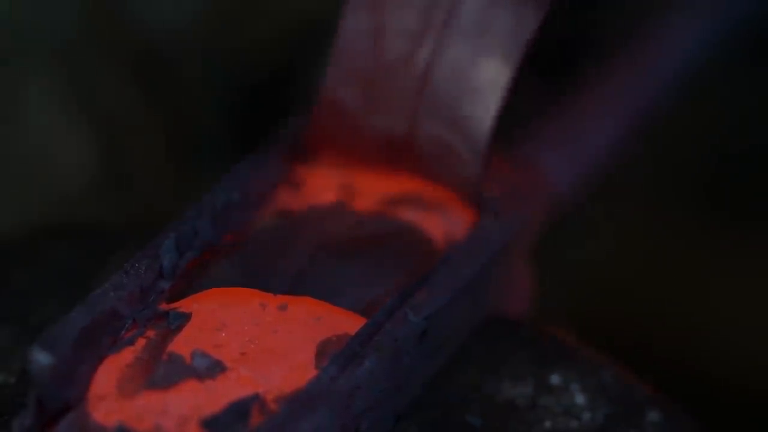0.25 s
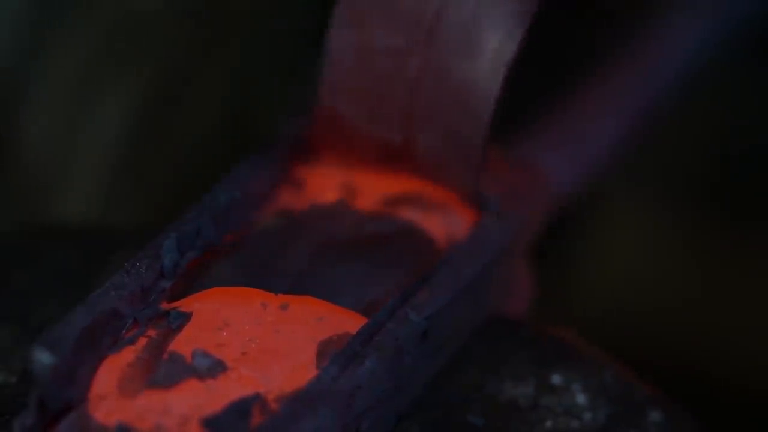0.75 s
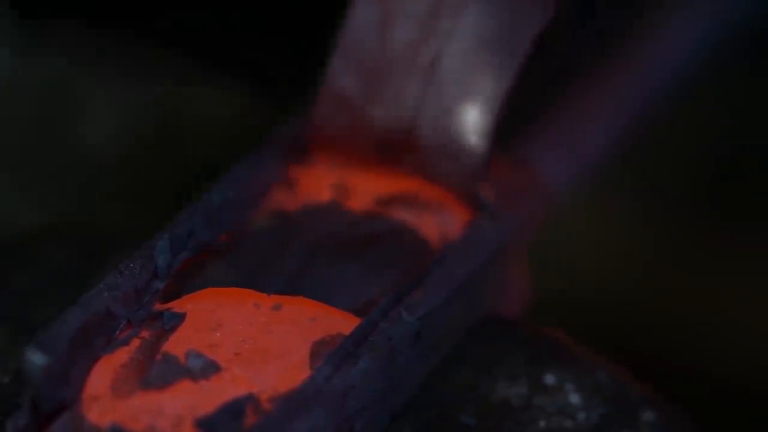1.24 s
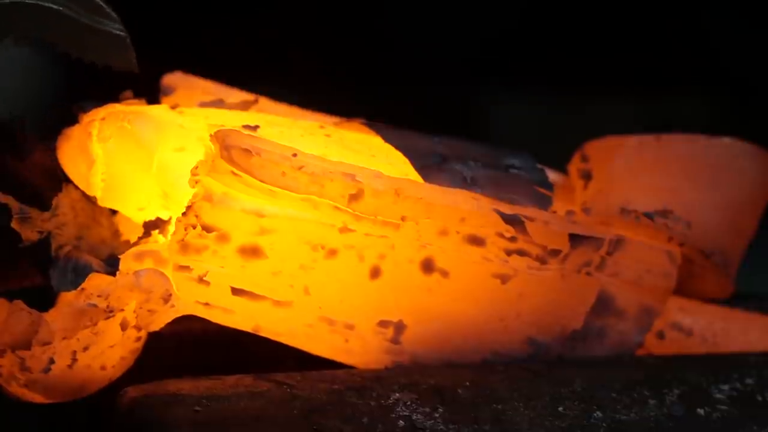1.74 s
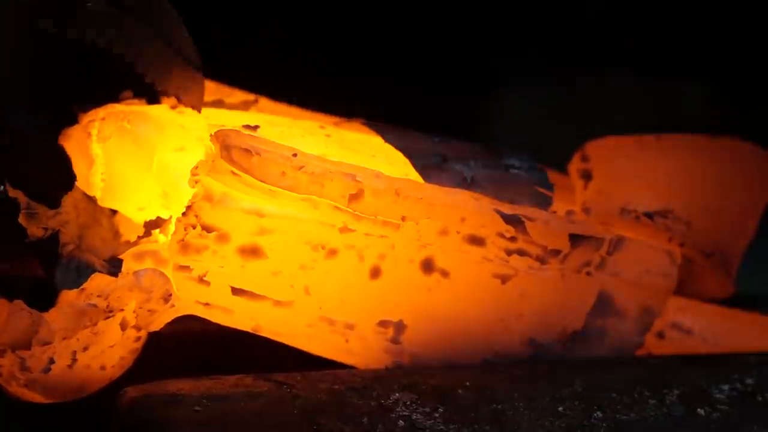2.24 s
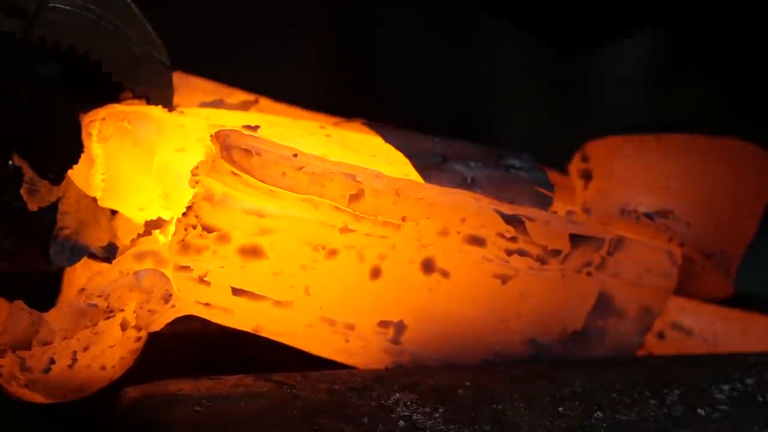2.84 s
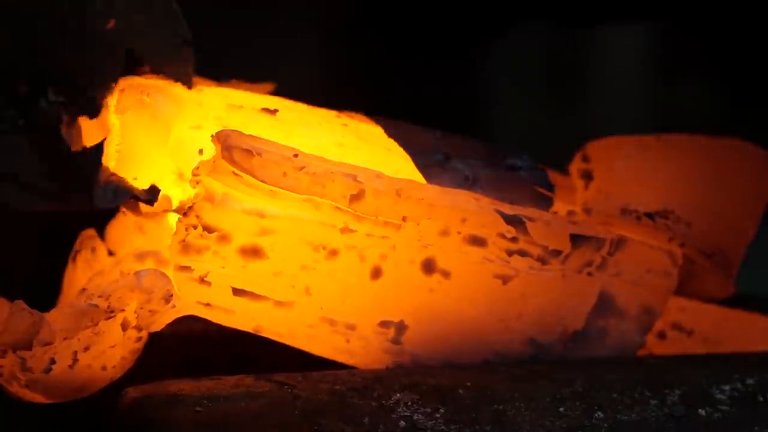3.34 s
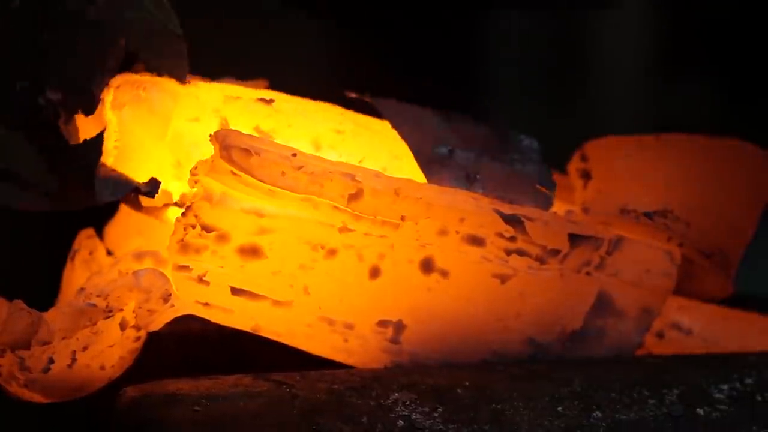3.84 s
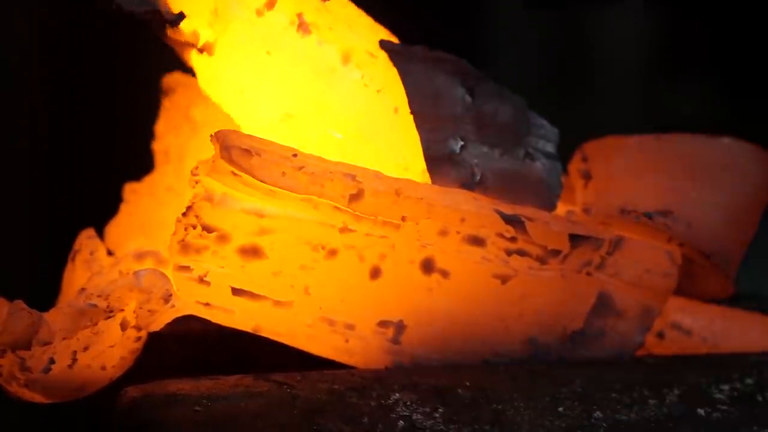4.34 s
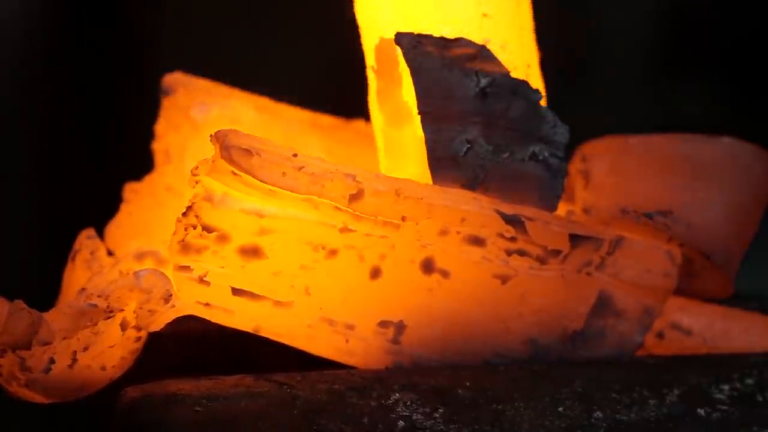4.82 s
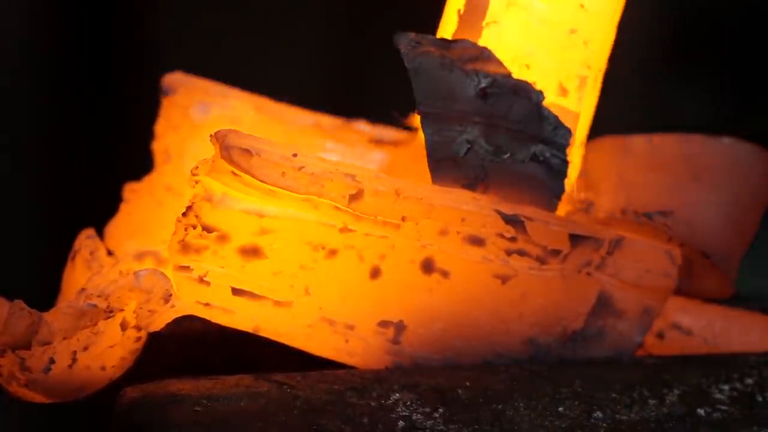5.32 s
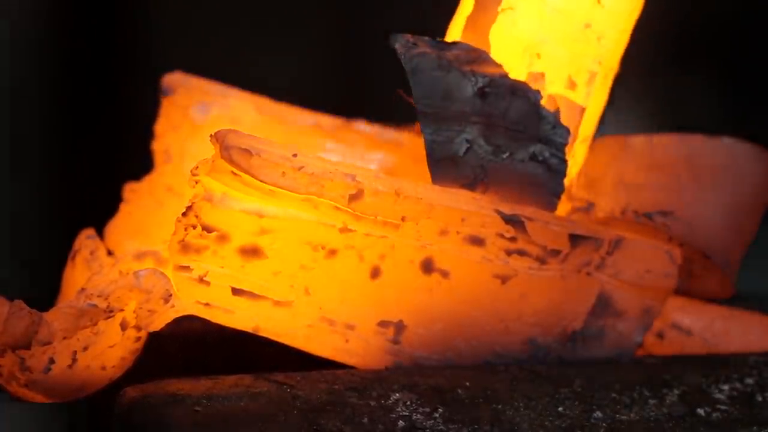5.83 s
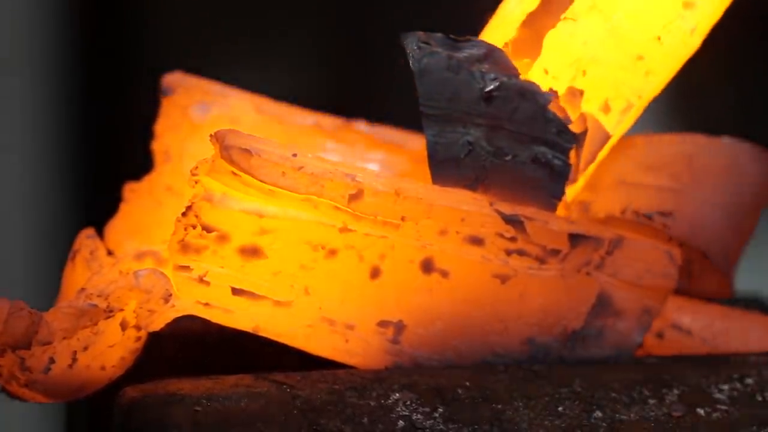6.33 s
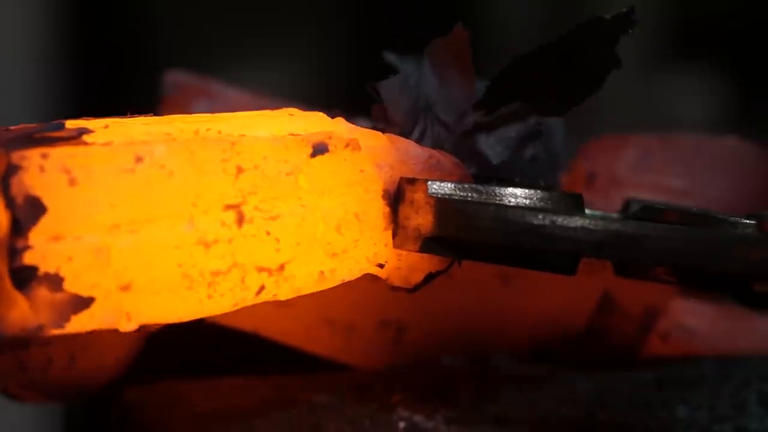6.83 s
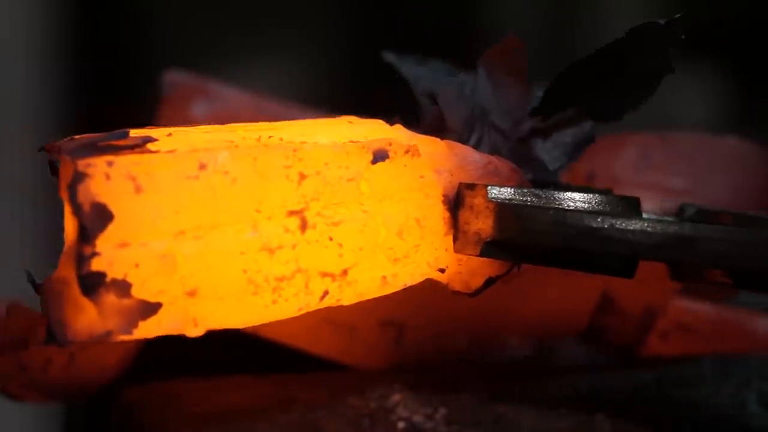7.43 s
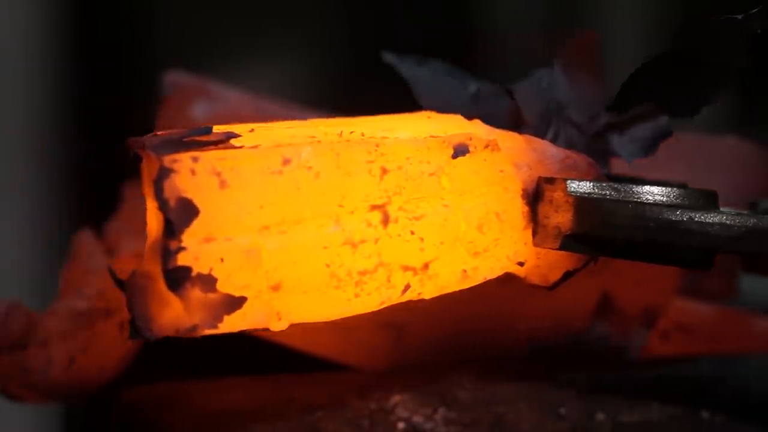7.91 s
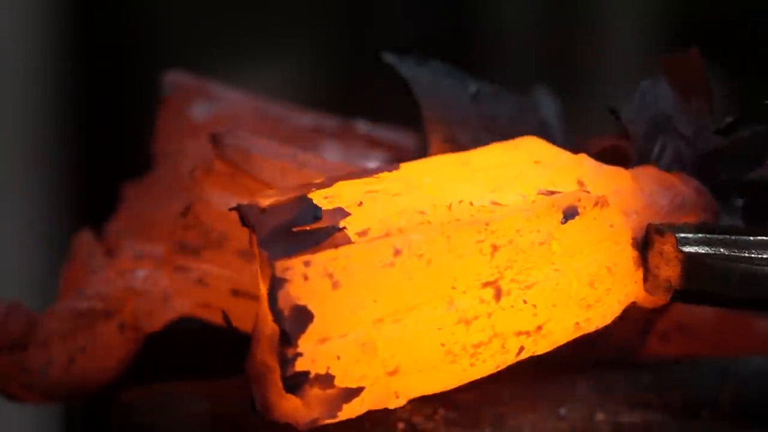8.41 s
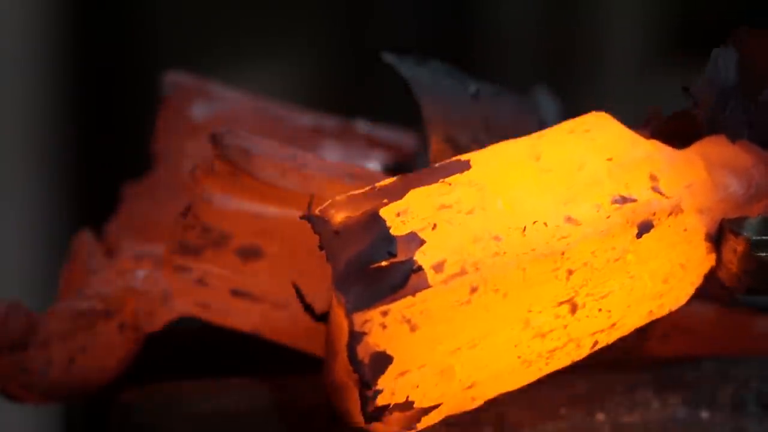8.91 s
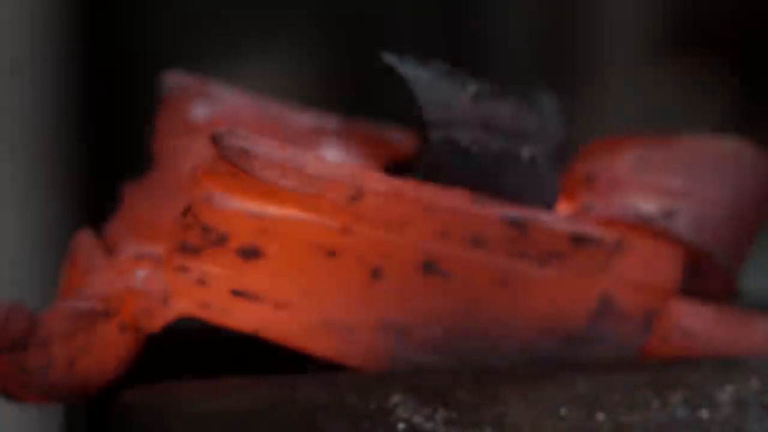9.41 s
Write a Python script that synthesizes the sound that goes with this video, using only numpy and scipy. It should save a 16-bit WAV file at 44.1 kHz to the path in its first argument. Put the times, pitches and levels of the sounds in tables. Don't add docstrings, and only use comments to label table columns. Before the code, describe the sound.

A gas forge booms low in a workshop, with faint jet hiss and mains hum and a lone early tick. The sound abruptly becomes fuller as tongs clink on hot steel, scale snapping and crumbling brightly. A short scraping slide follows, then a sharp cut to a steady roar with one last small knock. Close microphone, slight room echo.

```python
import sys
import numpy as np
from scipy import signal
from scipy.fft import rfft, irfft, next_fast_len
from scipy.io import wavfile
from scipy.ndimage import uniform_filter1d, minimum_filter1d, map_coordinates

SR = 44100
rng = np.random.default_rng(int(sys.argv[2]) if len(sys.argv) > 2 else 0)


def dump_mix(stems):
    frames = np.atleast_2d(stems).T
    limited = np.clip(frames, -1, 1)
    pcm = np.round(limited * 32767).astype(np.int16)
    wavfile.write(sys.argv[1], SR, pcm)


def linear_from_db(decibels):
    return 10 ** (np.asarray(decibels, float) / 20)


N = 426091
TOP_HZ = 15820

CUTS = [1.5241, 6.5789]
# start_s, fall_s (over 20 dB; negative leaves only a trickle),
# dull_swarm_db, middle_swarm_db, bright_swarm_db
KNOCKS = [(0.662, 0.03, -48.5, -63.5, -62.5), (2.292, 0.4, -76.5, -66.5, -75),
          (1.525, 0.03, -49, -43.5, -49.5), (1.546, 0.14, -50, -57, -55), (1.6, -0.02, -46.5, -48, -43),
          (2.253, 0, -71.5, -68, -68), (2.55, 0.05, -59.5, -67.5, -73.5), (2.563, -0.1, -69, -62, -63),
          (2.59, 0, -74, -66, -61.5), (3.372, 0.02, -51, -56, -53.5), (3.38, 0.03, -51, -46.5, -42.5),
          (3.799, -0.1, -74, -66, -55.5), (3.815, -0.07, -72, -66, -54), (3.82, -0.15, -63, -63.5, -54),
          (3.833, 0, -47.5, -46, -44), (4.071, 0.15, -73, -56.5, -68.5), (4.233, 0.02, -49.5, -43, -39),
          (4.358, .045, -64, -50.5, -53), (4.789, -0.2, -70, -62, -62), (4.842, -0.2, -72, -66, -62.5),
          (4.876, .07, -76, -50, -59.5), (9.484, 0, -55, -51.5, -53)]
# centre_hz, width_hz, level_db
BAR = [(5300, 330, 2), (6340, 450, 7), (6950, 180, 4), (8340, 250, 5.5), (10200, 970, 10), (11000, 300, 3),
       (13500, 900, 4), (15200, 800, 6.5)]


def unit(x):
    return x / np.sqrt(np.mean(x ** 2) + 1e-20)


def along(points, hz):
    f, v = np.transpose(points)
    return np.interp(np.log(hz + 1), np.log(f + 1), v)


def curves(spans):
    s, *cols = np.transpose([row for span in spans for row in span])
    return [np.interp(np.arange(N) / SR, s, c) for c in cols]


def filtered(x, response):
    m = next_fast_len(len(x) + 8192)
    return irfft(rfft(x, m) * response(np.fft.rfftfreq(m, 1 / SR)), m)[:len(x)]


def band(hz, centre_hz, octaves):
    return np.exp(-.5 * (np.log2((hz + 1) / centre_hz) / octaves) ** 2)


def lift(hz, modes):
    return sum(db / (1 + (2 * (hz - c) / w) ** 2) for c, w, db in modes)


def wobble(rate):
    return map_coordinates(rng.standard_normal(int(N * rate / SR) + 4), [np.arange(N) * rate / SR])


def stroke(s, rise_s, fall_s):
    out = np.zeros(N)
    start, stop = (int(np.clip(edge * SR, 0, N)) for edge in (s - 3 * rise_s, s + 4 * fall_s))
    t = np.arange(start, stop) / SR - s
    out[start:stop] = np.exp(np.log(10) * np.where(t < 0, t / rise_s, -t / fall_s))
    return out


def evened(x, share):
    power = np.abs(uniform_filter1d(uniform_filter1d(x ** 2, size=2500), size=2500)) + 1e-9
    return unit(x / power ** (share / 2))


def joined(takes):
    place = np.searchsorted(CUTS, np.arange(N) / SR)
    return sum(uniform_filter1d(1. * (place == k), size=60) * take for k, take in enumerate(takes))


def patchy(patchy_db):
    z = signal.stft(rng.standard_normal(N + 512), nperseg=512)[2]
    field = uniform_filter1d(rng.standard_normal(z.shape), size=6, axis=0)
    field = uniform_filter1d(field, size=14, axis=1)
    return signal.istft(z * linear_from_db(patchy_db * unit(field)), nperseg=512)[1][:N]


def rush(spectra, patchy_db, modes=()):
    air = patchy(patchy_db)
    takes = []
    for k, spectrum in enumerate(spectra):
        stretch = np.roll(air, k * SR)
        colour = lambda hz: linear_from_db(along(spectrum, hz) + lift(hz, modes)) * (hz < TOP_HZ)
        takes.append(unit(filtered(stretch, colour)))
    return joined(takes)


def blower():
    # pitch_hz, level_db (rms), sway_db
    mains = [(59.6, -48.5, -0.5), (117.4, -44, 2.5)]
    # frequency_hz, density_db (per Hz)
    drone_colour = [(15, -69.5), (30, -27.5), (45, -18.5), (59, -1), (70, -3), (88, 3.5), (100, -4.5),
                    (118, 6), (135, -6), (160, -13), (260, -120)]
    drone_db = [-51.5, -51, -50]
    t = np.arange(N) / SR
    hum = np.zeros(N)
    for hz, db, sway_db in mains:
        sway = map_coordinates(rng.standard_normal(90), [t * 8])
        hum += np.sqrt(2) * linear_from_db(db + sway_db * sway) * np.sin(2 * np.pi * hz * t)
    drone = unit(filtered(rng.standard_normal(N), lambda hz: linear_from_db(along(drone_colour, hz))))
    return joined([hum]) + joined(linear_from_db(drone_db)) * drone


def sizzle():
    sizzle_db = [-76, -79.5, -79.7]
    stirred_db, stirred_s = -37, .5
    clumps = linear_from_db(3 * map_coordinates(rng.standard_normal(300), [np.arange(N) * 25 / SR]))
    fizz = filtered(clumps * rng.standard_normal(N), lambda hz: band(hz, 13500, .22) * (hz < TOP_HZ))
    stirred = sum(linear_from_db(row[-1] + stirred_db) * stroke(row[0], 1 / SR, stirred_s) for row in KNOCKS)
    return linear_from_db(-5.5) * (linear_from_db(joined(sizzle_db)) + stirred) * unit(fizz)


def crumbling():
    # peak_s, fall_s (over 20 dB; zero or negative stays silent), dull_swarm_db,
    # middle_swarm_db, bright_swarm_db
    drags = [(.14, 0.2, -83, -76, -64), (3.865, 0.1, -64, -63, -60), (3.44, .06, -76, -72, -62),
             (3.55, 0.2, -80, -69, -78), (3.63, 0, -78, -78, -70), (3.93, 0.2, -70.5, -76, -76),
             (4.16, 0, -78, -76, -68), (4.3, 0.14, -76, -61, -61), (4.87, .06, -80, -66, -62),
             (4.905, 0.09, -75.5, -57, -57), (5.07, .12, -82, -72, -67), (5.33, 0.2, -84, -71, -72),
             (5.47, -0.2, -85, -67, -70), (5.9, 0.8, -84.5, -82, -74.5)]
    drag_rise = 0.73
    trickle_db, trickle_s = -24, 0.12
    shapes = []
    for s, fall_s, *_ in KNOCKS:
        trickle = linear_from_db(trickle_db) * stroke(s, 1 / SR, trickle_s)
        shapes.append(stroke(s, 1 / SR, fall_s) + trickle)
    for s, fall_s, *_ in drags:
        shapes.append(stroke(s, drag_rise * fall_s, fall_s))
    return linear_from_db(np.array(KNOCKS + drags)[:, 2:]).T @ np.array(shapes)


def scale():
    # lowest_hz, highest_hz
    swarms = [
        (5000, 9000),
        (9600, 12000),
        (12000, 18000),
    ]
    cracks = (rng.random(N) < 500 / SR) * rng.exponential(size=N)
    grit = rng.standard_normal(N) * (1 + 0.3 * unit(np.abs(uniform_filter1d(cracks, size=40))))
    out = np.zeros(N)
    for gain, (lo, hi) in zip(crumbling(), swarms):
        edge = lambda hz: (hz < TOP_HZ) / (1 + (lo / (hz + 1)) ** 32) / (1 + (hz / hi) ** 24)
        out += linear_from_db(-3.5) * gain * unit(filtered(grit, lambda hz: edge(hz) * linear_from_db(lift(hz, BAR))))
    return out


def slide():
    # peak_s, rise_s, fall_s (both over 20 dB), level_db
    swish_events = [
        (6.368, 0.099, 0.04, -43),
        (6.385, 0.1, 0.06, -42.5),
    ]
    # frequency_hz, density_db (per Hz)
    swish_colours = [
        [(1350, -30), (2300, -2), (2900, -1), (3400, -3), (4400, -1), (5200, -14.5), (6000, -40)],
        [(4600, -40), (5300, -20), (6350, -1.5), (7300, -3), (8420, -15), (11000, -13), (13800, -9.5),
         (15800, -11)],
    ]
    air = patchy(patchy_db=.8)
    out = np.zeros(N)
    for (*shape, db), colour in zip(swish_events, swish_colours):
        swish = unit(filtered(air, lambda hz: linear_from_db(along(colour, hz)) * (hz < TOP_HZ)))
        out += linear_from_db(db - 9.0) * np.minimum(.55, stroke(*shape)) * swish
    return out


def squeaks():
    # peak_s, rise_s, fall_s (both over 20 dB), level_db, pitch_hz
    rubs = [
        (0.76, .06, 0.3, -68, 5960),
        (1.008, .14, 0, -65.5, 6240),
        (5.045, .05, 0.2, -68, 10700),
        (5.135, 0.033, .1, -66, 11000),
        (5.36, 0.23, 0.3, -70.5, 10400),
        (5.55, .6, 0, -69, 10400),
        (5.75, .1, 0.4, -70.5, 10350),
        (6.15, .4, 0.4, -74, 10200),
        (6.165, .01, 0.2, -66, 10000),
    ]
    gains = np.array([linear_from_db(db) * stroke(s, rise_s, fall_s) for s, rise_s, fall_s, db, _ in rubs])
    pitch_hz = np.transpose(rubs)[-1][gains.argmax(axis=0)]
    start = rng.integers(0, N - 400, size=5000)
    size = linear_from_db(3 * rng.exponential(size=(len(start), 1)))
    hz = pitch_hz[start] * 2 ** (.022 * rng.standard_normal(len(start)))
    turns = np.arange(400) / SR * hz[:, None]
    wave = size * np.sin(2 * np.pi * turns) * np.exp(-turns / 26) * (1 - np.exp(-turns / 3))
    slips = np.bincount((start[:, None] + np.arange(400)).ravel(), wave.ravel(), N)
    return linear_from_db(0.8) * gains.max(axis=0) * evened(slips, share=.7)


def pings():
    # start_s, peak_db, pitch_hz, t60_s, rise_s
    modes = [(0.66, -49.5, 5450, 0.11, 0.00091), (0.6, -44, 3050, 0.023, .001),
             (1.53, -57, 5250, 0.22, .004), (2.55, -54.5, 4900, 0.075, 0.00089),
             (4.233, -49, 2020, 0.053, .001), (4.233, -58, 3880, .12, .001),
             (3.832, -37.5, 15600, .03, .001), (4.233, -41.5, 15500, .06, .001),
             (4.358, -53.5, 2000, .05, .001), (6.317, -56, 7900, .03, .001), (6.163, -54, 3400, .02, .001),
             (4.765, -57, 2530, .15, .006), (4.803, -58, 2545, .1, .004), (4.828, -52, 2520, 0.16, .005),
             (4.864, -55, 2100, .12, .004)]
    out, t = np.zeros(N + SR), np.arange(SR // 4) / SR
    for s, db, hz, t60, rise in modes:
        tone = (1 - np.exp(-t / rise)) * np.sin(2 * np.pi * hz * t)
        out[round(s * SR):][:len(t)] += linear_from_db(db - 60 * t / t60) * tone
    return out[:N]


def tongs():
    # start_s, mode_1_db, mode_2_db, mode_3_db, mode_4_db (peaks)
    blows = [(1.531, -50, -52, -62, -56), (1.546, -52, -49, -64, -62), (1.587, -52, -52, -66, -66),
             (1.6, -37.5, -43.5, -46, -37), (3.8333, -43, -28.5, -50, -44), (3.8385, -60, -54, -41, -52),
             (3.879, -66, -47, -62, -62), (4.2329, -51, -28, -29.5, -30), (4.358, -62, -60, -42, -43),
             (4.437, -69.5, -70.5, -61, -61), (9.4848, -64.5, -44.5, -41, -57)]
    jaws_hz = [7045, 8016, 11350, 13640]
    jaws_t60 = [.045, .032, .08, .085]
    out, t = np.zeros(N + SR), np.arange(SR // 4) / SR
    for s, *strengths_db in blows:
        for hz, t60, level_db in zip(jaws_hz, jaws_t60, strengths_db):
            beat = 1 + 0.45 * np.cos(2 * np.pi * rng.uniform(40, 110) * t)
            beat = beat + 0.91 * linear_from_db(-60 * t / 0.017)
            tone = (1 - np.exp(-t / 0.00045)) * np.sin(2 * np.pi * hz * t)
            out[round(s * SR):][:len(t)] += linear_from_db(level_db - 3.5 - 60 * t / t60) * beat * tone
    return out[:N]


def snaps():
    # start_s, peak_db, centre_hz, dull_part_db
    ticks = [(0.6609, -32, 6650, 2.5), (1.5247, -42, 10200, -12.5), (1.5287, -37, 9170, -19),
             (1.546, -30.5, 6800, -20.5), (1.5612, -25, 10170, -25), (1.5866, -35, 6780, -21),
             (1.5992, -25, 13630, -25), (2.2912, -44.5, 11200, -8), (2.5499, -42, 6680, -5),
             (3.3662, -46.5, 6000, -6), (3.3664, -47.5, 11000, -8), (3.372, -42, 4500, 6),
             (3.3798, -33.5, 6300, -14), (3.38, -27.5, 11200, -28), (3.3845, -32, 13000, -33),
             (3.5752, -47.5, 12200, -13), (3.7987, -41, 14040, -20), (3.8146, -33, 14050, -33),
             (3.8325, -26.5, 7900, -15), (4.0721, -42, 10350, -24), (4.1784, -48.5, 13930, -13),
             (4.232, -23, 11100, -25), (4.2733, -40, 9000, -25), (4.2958, -36.5, 13420, -24),
             (4.3052, -34, 11140, -34.5), (4.3412, -41, 10400, -20), (4.3576, -36.5, 10400, -9),
             (4.3836, -46, 14100, -26), (4.437, -44, 13500, -17.5), (4.8787, -42, 10100, -29),
             (6.1619, -42, 10200, -12), (6.5735, -23, 10200, -20.5), (9.4843, -41, 11350, -13)]
    # start_s, peak_db, centre_hz
    more_ticks = [(1.5305, -38, 12200), (1.5345, -36, 10000), (1.538, -37, 13500), (1.5535, -38, 8000),
                  (1.5615, -36, 13000), (1.577, -42, 6500), (3.3666, -48, 14500), (3.3735, -48, 10000),
                  (3.3801, -26, 13800), (3.7992, -50, 10100), (3.812, -43, 14200), (3.8328, -23, 13700),
                  (3.876, -46, 11000), (4.0775, -43, 10600), (4.082, -43, 10900), (4.103, -49, 11200),
                  (4.1361, -52, 11400), (4.1466, -50, 14100), (4.1701, -47, 13900), (4.29, -42, 11400),
                  (4.3058, -38, 14200), (4.7888, -53, 10500), (4.79, -54, 14800), (5.5351, -58, 10500),
                  (5.8144, -58, 10400), (5.88, -59, 10300), (4.8426, -52, 13500), (4.894, -42, 10300),
                  (4.915, -42, 10500), (5.022, -56, 10300), (5.07, -54, 10800), (5.35, -58, 10300),
                  (5.4702, -56, 10300), (5.557, -57, 10100), (5.7401, -55, 10300), (5.8419, -56, 10400),
                  (5.8593, -56, 10300)]
    shared_dull_db = -26
    out, t = np.zeros(N + SR), np.arange(SR // 40) / SR
    for s, db, centre_hz, dull_db in ticks + [(*row, shared_dull_db) for row in more_ticks]:
        burst = linear_from_db(-60 * np.abs(t - .001) / 0.0049) * (t > .001) * rng.standard_normal(len(t))

        def colour(hz):
            own = band(hz, centre_hz, 0.083)
            ringing = 0.069 * linear_from_db(lift(hz, BAR)) * band(hz, 12000, 0.26)
            dull = linear_from_db(dull_db - 6.0) * band(hz, 3500, 0.67)
            return (hz < TOP_HZ) * (own + ringing + dull)

        crack = filtered(burst, colour)
        out[round((s - .0003) * SR):][:len(t)] += linear_from_db(db - 1.5) * crack / np.abs(crack).max()
    return out[:N]


def shop(x):
    # frequency_hz, t60_s
    decay = [(3000, 0.37), (8000, .25), (15000, .2)]
    out, step = np.zeros(N), SR // 4
    for start in range(0, N, step):
        if np.abs(x[start:start + step]).max() < 1e-5:
            continue
        hz, t, z = signal.stft(rng.standard_normal(SR // 3), SR, nperseg=256)
        z *= linear_from_db(-60 * t / along(decay, hz)[:, None]) * (hz < TOP_HZ)[:, None]
        tail = signal.istft(z, SR, nperseg=256)[1]
        echo = signal.fftconvolve(x[start:start + step], tail / np.linalg.norm(tail))
        stop = min([round(s * SR) for s in CUTS if s * SR > start + step // 4] + [N])
        out[start:stop][:len(echo)] += echo[:stop - start]
    return out


def burner():
    # time_s, roar_db
    flow = [
        [(0, -21), (.75, -23.5), (1.05, -25), (1.52, -23.5)],
        [(1.53, -19), (2.1, -19.5), (2.85, -21), (3.5, -21), (4.2, -22), (5, -22.5), (5.6, -24.5), (6.1, -23),
         (6.57, -24)],
        [(6.58, -19), (7.1, -20.5), (8, -21), (9.1, -20.5), (9.66, -19.5)],
    ]
    # frequency_hz, density_db (per Hz)
    roar_colours = [
        [(130, -58), (215, -19.5), (226, -21.5), (268, -13.5), (294, -13), (318, -2), (336, -7.5), (356, -20),
         (403, -27), (443, -20), (620, -40.5), (810, -71), (1360, -120)],
        [(130, -44.5), (215, -11), (237, -2.5), (285, 4.5), (338, 1.5), (359, -4), (393, -1), (477, -15.5),
         (550, -26), (620, -41.5), (810, -67.5), (1360, -120)],
        [(130, -50), (215, -10.5), (258, -1), (333, 1), (361, -7), (398, -4), (429, -6), (465, -18.5),
         (519, -20.5), (555, -33.5), (620, -33.5), (810, -57), (1360, -120)],
    ]
    # frequency_hz, density_db (per Hz)
    rumble_colours = [
        [(82, -42.5), (140, -15.5), (161, -4.5), (183, 6), (226, -13.5), (230, -14), (300, -49.5), (510, -120)],
        [(79, -50.5), (135, -23), (167, -8), (210, -10.5), (230, -2.5), (300, -29.5), (510, -120)],
        [(79, -44), (135, -15.5), (172, -1.5), (215, -3.5), (230, -5.5), (300, -24), (510, -120)],
    ]
    # frequency_hz, density_db (per Hz)
    hiss_colours = [
        [(350, -45), (590, -3), (726, -1.5), (957, -17), (1010, -17.5), (1230, -24.5), (1330, -23), (1860, -25),
         (2070, -31.5), (2480, -25.5), (3910, -33), (4550, -32), (5160, -35.5), (6000, -38), (16000, -46.5)],
        [(330, -27), (560, 6), (721, -5.5), (762, -6.5), (818, -3.5), (928, -9), (1010, -8), (1250, -17.5),
         (1820, -20.5), (2970, -25), (4160, -25), (4720, -31), (6080, -33.5), (14500, -41), (16000, -43.5)],
        [(330, -27.5), (560, -0.5), (601, -0.5), (672, -10.5), (841, -6), (1250, -20.5), (1790, -23.5),
         (2810, -27.5), (2930, -28.5), (4160, -27.5), (4790, -34.5), (5830, -36.5), (6900, -38), (13700, -45),
         (16000, -48.5)],
    ]
    # centre_hz, width_hz, level_db
    shop_modes = [(214.6, 9.9, -5.5), (377, 1.1, -7), (442.6, 22, -2), (563, 13, -7), (725, 20, 4.5),
                  (825, 13, -7), (823, 26, 5), (915, 13, -3), (944, 16, -6.5), (1126, 60, 5),
                  (1148, 20, -7.5), (1425, 43, 5), (1605, 39, 6), (1750, 33, 7), (1862, 66, 7.5),
                  (1970, 30, 3.5), (2140, 60, 5), (2333, 53, 8), (2450, 36, -2), (2544, 59, 6.5),
                  (2774, 36, 7), (3650, 270, 1.5), (4300, 58, 5), (5940, 800, 5.5), (8120, 470, 5.5),
                  (10400, 870, 4.5)]
    rumble_over_roar_db, rumble_grows = [-12.5, -15, -14.5], 2.26
    jet_db, hiss_grows = [-48, -50, -51], 0.12
    roar_db, = curves(flow)
    mean_db = joined([np.mean(span, axis=0)[1] for span in flow])
    surge_db = roar_db - mean_db
    roar = evened(rush(roar_colours, patchy_db=-0.22, modes=shop_modes), share=0.22)
    roar = linear_from_db(roar_db - 0.09 + 1.2 * wobble(8)) * roar
    rumble_db = mean_db + joined(rumble_over_roar_db) + rumble_grows * surge_db + 2.2 * wobble(6)
    rumble = evened(rush(rumble_colours, patchy_db=0.3, modes=shop_modes), share=0.034)
    rumble = linear_from_db(rumble_db + 0.48) * rumble
    hiss_db = joined(jet_db) + hiss_grows * surge_db + 0.79 * wobble(5)
    hiss = linear_from_db(hiss_db + 1.0) * rush(hiss_colours, patchy_db=1.0, modes=shop_modes)
    return roar + rumble + hiss


def scene():
    hits = snaps() + tongs() + pings()
    work = hits + linear_from_db(-14.5) * shop(hits) + scale() + squeaks() + slide() + sizzle()
    return (blower() + work + burner())[None]


def band_limit(x):
    return signal.sosfilt(signal.butter(12, 16550, fs=SR, output="sos"), x)


def record(dry):
    clicks_db = [-35.5, -27]
    need = np.minimum(1, .335 / (np.abs(dry) + 1e-9))
    out = dry * uniform_filter1d(minimum_filter1d(need, size=900), size=450)
    for s, db in zip(CUTS, clicks_db):
        out[:, round(s * SR):][:, :200] += linear_from_db(db) * np.exp(-np.arange(200) / SR / 0.0015)
    return band_limit(out)


dry = scene()
out = record(dry)
dump_mix(out)
```